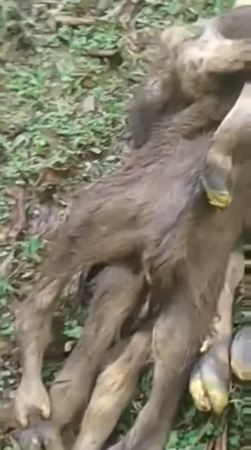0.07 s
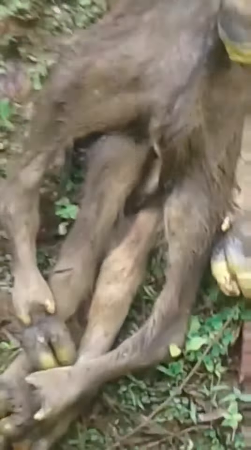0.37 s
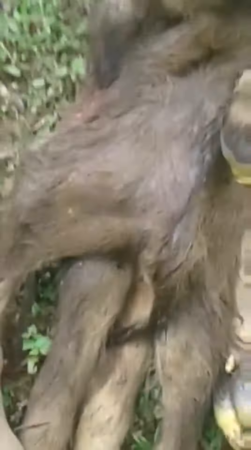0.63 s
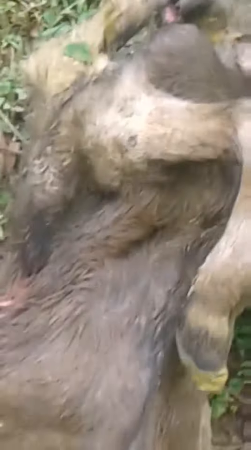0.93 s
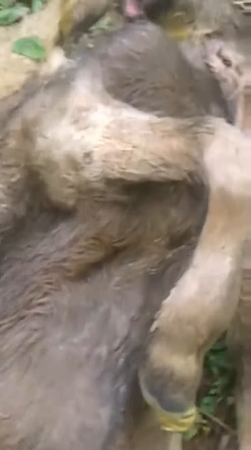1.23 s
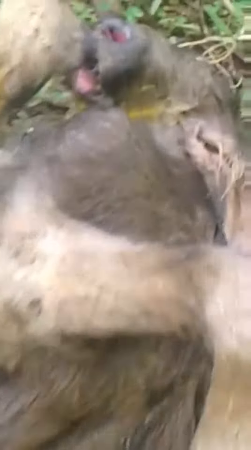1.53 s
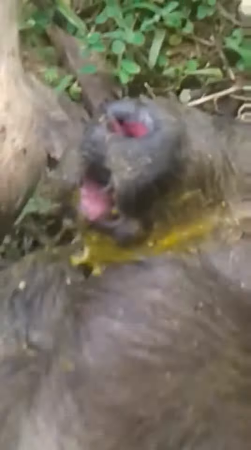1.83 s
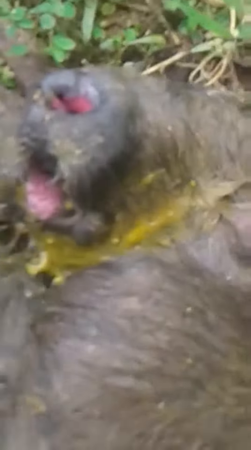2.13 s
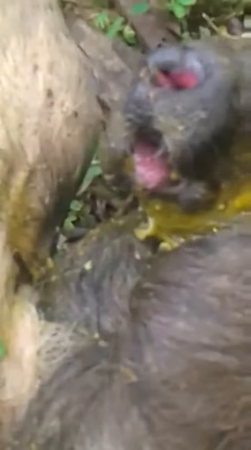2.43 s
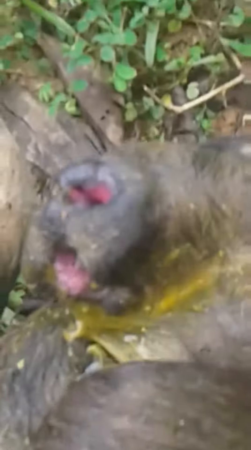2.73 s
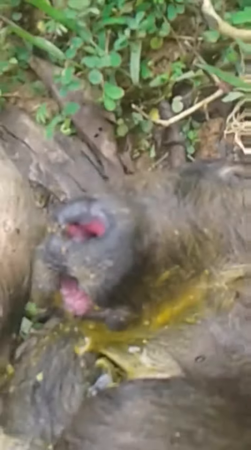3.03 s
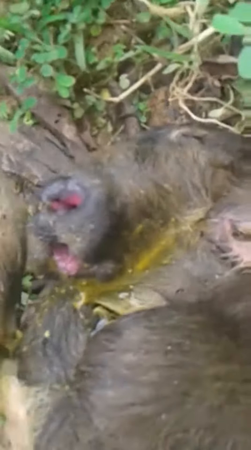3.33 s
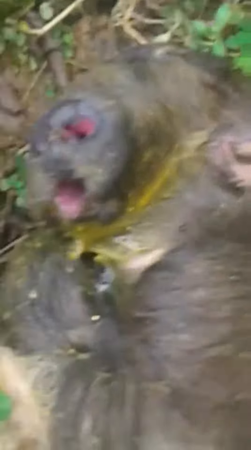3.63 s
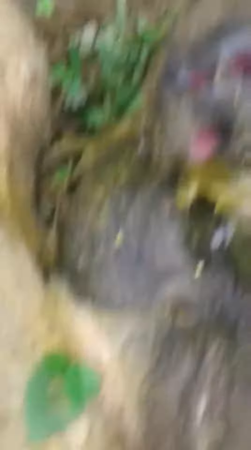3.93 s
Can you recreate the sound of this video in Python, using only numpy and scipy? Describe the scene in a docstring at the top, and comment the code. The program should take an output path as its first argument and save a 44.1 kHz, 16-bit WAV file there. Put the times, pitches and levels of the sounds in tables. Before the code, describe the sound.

Close, dry handling noise hisses and ticks against the microphone outdoors, carrying a high, insect-like tone. A far bird chirps faintly, the grip slips with a brief knock, and the rubbing dies away into quiet air and soft wind buffets.

```python
"""A broad hiss with a shrill, insect-like band near 8 kHz, heard as a hand rubs a phone's casing.
Both are filtered noise; they dull and die away, leaving quiet outdoor air and low buffets of wind.
Handling near the microphone port excites damped resonances: grainy rustles, small ticks, soft thumps,
and slips of the grip that give a few dull pulses and one short crackling knock.
A far bird chirps faintly. The rest is close, and the whole scene is dry and mono."""
import sys
import numpy as np
from scipy import signal
from scipy.io import wavfile
from scipy.ndimage import map_coordinates

SR = 44100
rng = np.random.default_rng(int(sys.argv[2]) if len(sys.argv) > 2 else 0)


def master(y):
    """Save y as 16-bit WAV."""
    cut = np.clip(np.atleast_2d(y).T, -1, 1)
    pcm = np.round(cut * 32767)  # scale
    wavfile.write(sys.argv[1], SR, pcm.astype(np.int16))


N = 176400
TIME = np.arange(N) / SR
RING_HZ, RING_WIDTH_HZ = 8300, 1220   # shrill ring of the rustles; the knocks' ring shares its width

# envelope of the hiss: (time [s], level [dB])
HISS_LEVEL = [(0, -43), (.15, -43.5), (.28, -49), (.52, -48.5), (.66, -50.5), (.82, -46), (1.0, -48),
              (1.12, -49.5), (1.43, -50.5), (1.68, -45), (1.85, -49), (2.1, -50.5), (2.6, -48.5),
              (3.1, -50.5), (3.25, -52.5), (3.45, -63), (4, -79)]
# spectrum of the hiss: (frequency [Hz], gain [dB])
HISS_SPECTRUM = [(40, -34), (100, -18), (150, -5.5), (220, -9), (450, -5), (900, -1), (1800, 0),
                 (3000, -2.5), (4300, -2.5), (5900, -2.5), (7000, -0.5), (9300, -1), (11300, -12.5),
                 (13200, -15), (14600, -16), (15500, -18)]
# upper edge of the hiss: (time [s], cutoff [Hz])
HISS_CUTOFF = [(0, 18000), (1.8, 18000), (1.95, 7700), (2.01, 7700), (2.07, 11700), (2.28, 11000),
               (2.36, 17000), (2.66, 11000), (2.77, 6300), (2.85, 5150), (2.93, 6450), (3.12, 5300),
               (3.22, 3500), (3.34, 1690), (4, 1190)]
# envelope of the shrill band: (time [s], level [dB])
SHRILL_LEVEL = [(0, -46), (.12, -30.5), (.22, -35), (.31, -36), (.5, -33), (.79, -33.5), (1.01, -34.5),
                (1.14, -33.5), (1.5, -37), (1.7, -33), (1.9, -38), (1.96, -52), (2.01, -48), (2.08, -35.5),
                (2.25, -40), (2.44, -35), (2.56, -39), (2.63, -34), (2.8, -70), (3.3, -97)]
# centre of the shrill band: (time [s], frequency [Hz])
SHRILL_CENTRE = [(0, 8250), (.4, 8020), (.8, 8030), (1.35, 7870), (1.65, 8100), (1.92, 7580), (1.965, 6900),
                 (2.02, 7450), (2.09, 8060), (2.35, 8030), (2.62, 7800), (2.66, 7300)]
# envelope of the fainter band above it: (time [s], level [dB])
UPPER_LEVEL = [(0, -69), (.17, -43.5), (.75, -44), (1.2, -46), (1.75, -46), (1.88, -51), (1.97, -54),
               (2.1, -50), (2.5, -52.5), (2.68, -53), (2.8, -66), (3.1, -65), (3.3, -87)]
# spectrum of that upper band: (frequency [Hz], gain [dB])
UPPER_SPECTRUM = [(8800, -42), (9700, -4), (10400, 0.5), (11200, 0), (11500, -15), (13000, -21)]
# handling rubs: (start [s], attack [s], hold [s], decay constant [s], level [dB], low edge [Hz],
# high edge [Hz], body frequency [Hz], body gain [dB], ring gain [dB])
RUSTLES = [(0.004, 0.0089, 0.029, 0.014, -47.5, 400, 8000, 4430, 7.5, 15.5),
           (0.06, .004, 0.047, 0.067, -47.5, 1500, 8500, 2730, 8, 9),
           (0.34, 0.0051, 0.012, 0.02, -43, 150, 13400, 9300, 6, -9),
           (0.808, .006, 0.012, 0.04, -55, 700, 10000, 1900, 14.5, -4),
           (0.926, .012, 0.017, 0.014, -48, 1800, 11500, 3870, -1, 2),
           (1.06, .03, 0.15, 0.087, -56.5, 1000, 2600, 1810, 9.5, -20),
           (1.484, 0.022, 0.026, .006, -55, 700, 2500, 1550, 13, -20),
           (1.572, 0.042, 0.023, 0.028, -47, 1500, 10700, 3430, 6, 9.5),
           (1.654, 0.019, 0.21, 0.027, -54, 247, 900, 345, 1, -20),
           (2.314, 0.0049, 0.025, 0.053, -41, 2260, 10600, 3080, 0, 1.5),
           (2.5, .001, 0.0024, 0.0043, -45.5, 3400, 15000, 4100, 10, 8.5),
           (2.622, 0.033, 0.028, 0.024, -44, 1400, 6700, 5950, 9.5, -14),
           (2.676, 0.011, 0.02, 0.0074, -41, 1470, 6800, 3270, -20, -19),
           (2.723, 0.01, 0.0088, .03, -46, 3500, 7000, 5850, -3, -11),
           (2.868, 0.013, 0.0074, 0.0094, -36.5, 352, 3540, 1590, 2, -20),
           (2.874, 0.017, 0.0066, 0.013, -35.5, 2120, 5000, 5200, -0.5, -30),
           (3.665, 0.017, 0.016, .006, -55, 300, 900, 553, 10, -31)]
# small contacts and slips on the casing:
# (time [s], body peak [dB], body frequency [Hz], body width [Hz], ring peak [dB])
HANDLING_TICKS = [(0.0647, -29, 2880, 500, -42), (0.07, -24, 2820, 520, -34), (.0816, -39, 3000, 1500, -29),
                  (0.096, -31.5, 2870, 700, -42), (0.1, -32.5, 3080, 600, -28),
                  (0.1425, -37.5, 700, 800, -48), (0.3489, -30, 4540, 3000, -26),
                  (0.363, -41, 1900, 1000, -40), (.4857, -36, 1380, 700, -50),
                  (0.5408, -35.5, 1870, 1500, -46), (0.7426, -39, 4500, 2000, -40),
                  (0.8198, -44, 2000, 1800, -37), (.9567, -46, 4000, 3000, -31),
                  (1.1354, -46, 4000, 3000, -32), (1.5223, -29, 4000, 3500, -35),
                  (1.5232, -36, 1490, 700, -46), (1.5485, -37, 3500, 3000, -35),
                  (1.5547, -31, 5200, 4000, -15.5), (1.617, -43, 3000, 2000, -32),
                  (1.627, -39, 2700, 2000, -33), (1.6366, -36, 3500, 3000, -29.5),
                  (1.6433, -25.5, 4400, 2800, -34), (1.6595, -40, 4000, 3000, -33),
                  (1.6775, -48, 4000, 3000, -33), (1.7083, -47, 4500, 3000, -32),
                  (1.8855, -44, 700, 600, -38), (2.3214, -34, 3080, 1100, -28.5)]
# modes of a tick's shrill ring in the microphone port: (frequency [Hz], gain [dB])
TICK_MODES = [(7750, -2), (8550, -1), (14900, -19.5)]
# pulses on the casing: (time [s], peak level [dB], low-pass corner [Hz])
CASING_KNOCKS = [(.5416, -43.5, 600), (0.8413, -41.5, 700), (1.3109, -41, 900), (1.9863, -43, 600),
                 (2.0220, -18, 2330), (2.0236, -23.5, 1600), (2.026, -24.5, 1800), (2.0312, -27, 1300),
                 (2.0339, -27, 700), (2.0361, -34.5, 597), (2.0442, -46.5, 400), (3.3966, -40, 570)]
# bumps of the hand: (time [s], peak level [dB], frequency [Hz])
HAND_THUMPS = [(0.042, -50, 112), (0.082, -55.5, 127), (0.348, -48, 159), (0.383, -52.5, 140),
               (.862, -49.5, 230), (2.03, -52, 230), (2.642, -56, 137), (2.92, -51.5, 179),
               (3.368, -50.5, 182)]
# bird whistles: (start [s], length [s], start frequency [Hz], end frequency [Hz], peak level [dB])
BIRD_CHIRPS = [(1.245, .048, 3130, 2570, -55.5), (1.262, .034, 3020, 2840, -58),
               (1.302, .028, 2680, 2330, -60)]
# envelope of the wind on the microphone: (time [s], level [dB])
WIND_LEVEL = [(0, -72), (3.05, -56), (3.33, -35.5), (3.48, -38), (3.56, -32.5), (3.6, -41), (3.65, -26),
              (3.69, -39), (3.74, -30), (3.8, -39), (3.89, -30.5), (3.95, -32), (4, -35)]
# spectrum of the wind: (frequency [Hz], gain [dB])
WIND_SPECTRUM = [(15, -11), (40, -4.5), (80, -1.5), (130, -6.5), (200, -21.5), (500, -34), (2000, -54)]
# spectrum of the quiet air: (frequency [Hz], level [dB])
AIR_SPECTRUM = [(30, -57), (85, -74), (150, -53), (400, -56.5), (1000, -59), (2000, -63), (4000, -67.5),
                (8000, -73), (15500, -72)]


def hiss(edge_order=5.1, leak_db=-18.5):
    """Spectral shaping: faintly crackling noise dulls as its low-pass edge falls."""
    def gain(hz, t):
        power_passed = 1 / (1 + (hz / in_time(HISS_CUTOFF, t)) ** (2 * edge_order))
        power_passed += from_db(leak_db) ** 2   # a little still passes above the edge
        level = at_hz(HISS_SPECTRUM, hz) + in_time(HISS_LEVEL, t) + hiss_flicker(hz, t)
        return from_db(level) * np.sqrt(power_passed)
    crackle = grains(per_s=45, spread_db=2.5)
    return coloured(rng.standard_normal(N) + crackle, gain)


def hiss_flicker(hz, t, depth_db=2, width_hz=276.7, per_s=14):
    """Random amplitude modulation, in dB: brief swells and dips in narrow patches of the spectrum."""
    cells = np.broadcast_arrays(hz / width_hz, t * per_s)
    return depth_db * map_coordinates(rng.standard_normal((256, 256)), cells, order=1, mode="wrap")


def shrill_band(width_hz=686, waver_hz=50, flicker_db=1.6):
    """Resonance: a narrow, wavering peak gives grainy noise a pitch; a fainter band lies above it."""
    def resonance(hz, t):
        centre = in_time(SHRILL_CENTRE, t) + waver_hz * drift(t, per_s=30.7)
        level = in_time(SHRILL_LEVEL, t) + flicker_db * drift(t, per_s=60)
        return from_db(level) / (1 + (2 * (hz - centre) / width_hz) ** 2)
    snaps = from_db(9) * grains(per_s=330, spread_db=1.5)
    narrow = coloured(rng.standard_normal(N) + snaps, resonance)
    return narrow + shaped_noise(UPPER_SPECTRUM, UPPER_LEVEL)


def rustles(slip_share=0.69):
    """Stick-slip friction: dense tiny slips drive a body resonance and a shrill ring in short rubs."""
    slips = grains(per_s=3900, spread_db=3.5)
    friction = np.sqrt(slip_share) * slips / slips.std()
    friction += np.sqrt(1 - slip_share) * rng.standard_normal(N)
    ring = resonate(friction, RING_HZ, RING_WIDTH_HZ)
    out = np.zeros(N)
    for start, attack, hold, decay, db, low_hz, high_hz, body_hz, body_db, ring_db in RUSTLES:
        rise = np.clip((TIME - start) / attack, 0, 1)
        fall = np.exp(-np.maximum(TIME - start - attack - hold, 0) / decay)
        body = resonate(friction, body_hz, width_hz=0.15 * body_hz)
        rub = friction + from_db(body_db) * body + from_db(ring_db) * ring
        rub = cut(cut(rub, low_hz, "high"), high_hz, "low", order=3)
        out += from_db(db) * rise * fall * rub
    return out


def handling_ticks(scrape_db=-19.5, scrape_decay_s=0.0011, mode_width_hz=910, mode_spread_db=3.5):
    """Modal excitation: a small contact and slip on the casing ring a damped body and shrill modes."""
    out = np.zeros(N)
    for start, body_db, hz, width_hz, ring_db in HANDLING_TICKS:
        snap = click()
        scrape = rng.standard_normal(len(snap)) * np.exp(-TIME[:len(snap)] / scrape_decay_s)
        snap += from_db(scrape_db) * scrape
        body = resonate(resonate(snap, hz, width_hz), hz, 3 * width_hz)
        body = cut(body, 1.45 * hz, "low")
        ring = np.zeros(len(snap))
        for mode_hz, mode_db in TICK_MODES:
            strength = from_db(mode_db + mode_spread_db * rng.standard_normal())
            ring += strength * resonate(resonate(snap, mode_hz, mode_width_hz), mode_hz, mode_width_hz)
        add(out, start, peak_at(body, body_db) + peak_at(ring, ring_db))
    return out


def casing_knocks(hollow_gain_db=-6, ring_gain_db=14.5):
    """Impulse response: slips of the grip ring the hollow casing; a briefer pulse sounds brighter."""
    out = np.zeros(N)
    for start, db, corner_hz in CASING_KNOCKS:
        pulse = cut(click(), corner_hz, "low", order=1)
        pulse = cut(cut(pulse, 260, "high"), 2.6 * corner_hz, "low")
        body = pulse + from_db(hollow_gain_db) * resonate(pulse, hz=680, width_hz=670)
        ring = from_db(ring_gain_db) * resonate(body, hz=7550, width_hz=RING_WIDTH_HZ)
        add(out, start, peak_at(-(body + ring), db))
    return out


def hand_thumps():
    """Heavy damping: a soft bump of the hand rings a low resonance for only a cycle or two."""
    out = np.zeros(N)
    for start, db, hz in HAND_THUMPS:
        bump = resonate(click(), hz, width_hz=0.48 * hz)
        add(out, start, peak_at(cut(bump, 2 * hz, "low"), db))
    return out


def far_bird(waver_hz=70):
    """Frequency modulation: each thin whistle is a sine tone that wavers as it glides down."""
    out = np.zeros(N)
    for start, length, start_hz, end_hz, db in BIRD_CHIRPS:
        t = TIME[:int(length * SR)]
        hz = start_hz + (end_hz - start_hz) * t / length + waver_hz * drift(t, per_s=208)
        envelope = np.sqrt(np.sin(np.pi * t / length))
        add(out, start, from_db(db) * envelope * np.sin(2 * np.pi * np.cumsum(hz) / SR))
    return out


def wind():
    """Turbulence: uneven pressure on the microphone gives low buffets near the end."""
    return shaped_noise(WIND_SPECTRUM, WIND_LEVEL)


def still_air():
    """Stationary noise: the quiet outdoor background keeps a constant spectrum."""
    return coloured(rng.standard_normal(N), lambda hz, t: from_db(at_hz(AIR_SPECTRUM, hz)))


def from_db(db):
    """Amplitude ratio: tenfold for every 20 dB."""
    return 10 ** (np.asarray(db) / 20)


def in_time(curve, t):
    """Linear interpolation of a curve at times t."""
    return np.interp(t, *np.transpose(curve))


def at_hz(spectrum, hz):
    """Interpolation of a spectrum on a log-frequency axis."""
    points_hz, db = np.transpose(spectrum)
    return np.interp(np.log(hz), np.log(points_hz), db)


def drift(t, per_s):
    """Random fluctuation: straight lines between Gaussian values of unit spread."""
    return np.interp(t * per_s, np.arange(2048), rng.standard_normal(2048))


def coloured(x, gain):
    """Time-varying filtering: gain(hz, t) weights the short-time spectrum of x."""
    hz, t, spectrum = signal.stft(x, SR, nperseg=1024, noverlap=768)
    return signal.istft(spectrum * gain(hz[:, None] + 1, t), SR, nperseg=1024, noverlap=768)[1][:N]


def shaped_noise(spectrum, envelope):
    """Source and filter: white noise takes on a spectrum and a level that changes with time."""
    white = rng.standard_normal(N)
    return coloured(white, lambda hz, t: from_db(at_hz(spectrum, hz) + in_time(envelope, t)))


def cut(x, hz, kind, order=2):
    """Butterworth low-pass or high-pass: 6 dB per octave for each order."""
    return signal.sosfilt(signal.butter(order, min(hz, SR * .45), kind, fs=SR, output="sos"), x)


def resonate(x, hz, width_hz):
    """Damped resonator with unit peak gain: the wider its band, the faster it decays."""
    radius = np.exp(-np.pi * width_hz / SR)
    feedback = [1, -2 * radius * np.cos(2 * np.pi * hz / SR), radius ** 2]
    return signal.lfilter(np.array([1, 0, -1]) * (1 - radius ** 2) / 2, feedback, x)


def grains(per_s, spread_db):
    """Shot noise: independent clicks of random size and sign."""
    sizes = from_db(spread_db * np.minimum(rng.exponential(1, N), 4)) * rng.choice([-1, 1], N)
    return sizes * (rng.random(N) < per_s / SR)


def click():
    """Unit impulse: one contact, with a flat spectrum."""
    return signal.unit_impulse(4096) + 1e-18


def peak_at(x, db):
    """Normalisation of a short sound to a peak level."""
    return from_db(db) * x / np.abs(x).max()


def add(out, start_s, x):
    """Superposition of a short sound on the mix."""
    i = max(int(start_s * SR), 0)
    out[i:i + len(x)] += x[:max(N - i, 0)]


def scene():
    """Superposition: all sources sum at one microphone, the same in both channels."""
    mono = hiss() + shrill_band() + still_air() + wind()
    mono += rustles() + far_bird() + handling_ticks() + casing_knocks() + hand_thumps()
    return np.array([mono, mono])


def record(dry, cutoff_hz=15900):
    """Band limiting: an elliptic low-pass cuts the top of the spectrum steeply."""
    return signal.sosfilt(signal.ellip(10, .1, 70, cutoff_hz, fs=SR, output="sos"), dry)


dry = scene()
out = record(dry)
master(out)
```